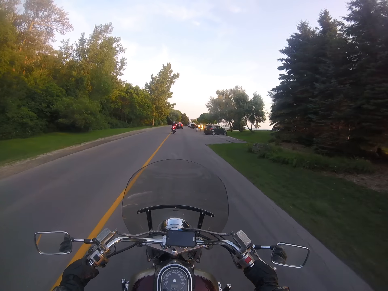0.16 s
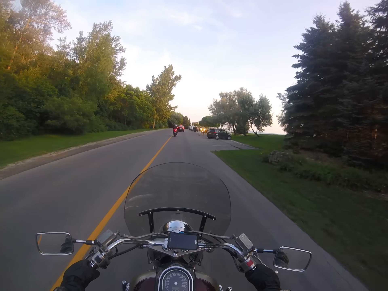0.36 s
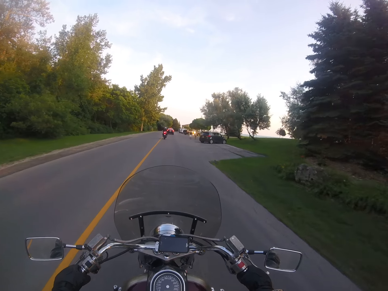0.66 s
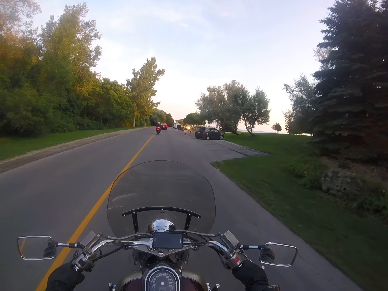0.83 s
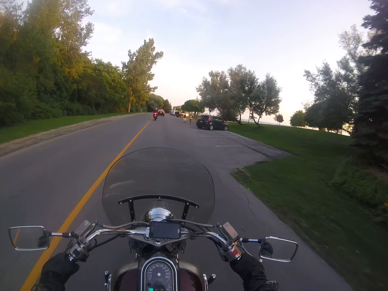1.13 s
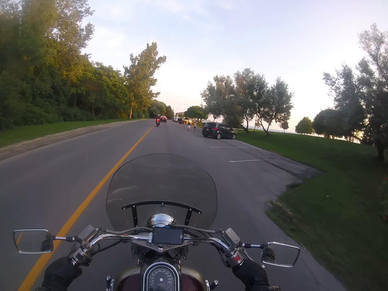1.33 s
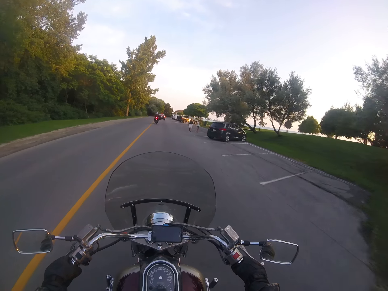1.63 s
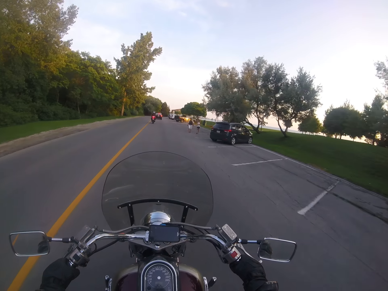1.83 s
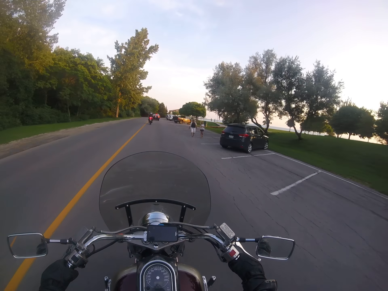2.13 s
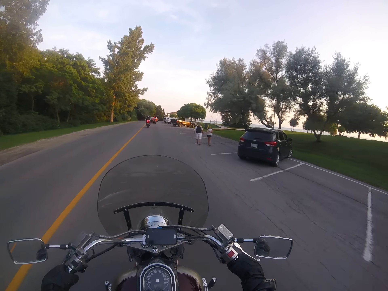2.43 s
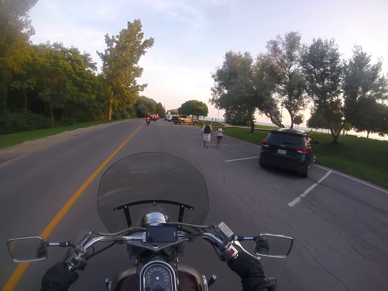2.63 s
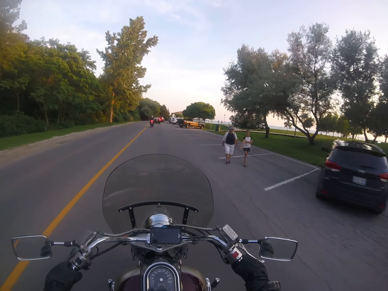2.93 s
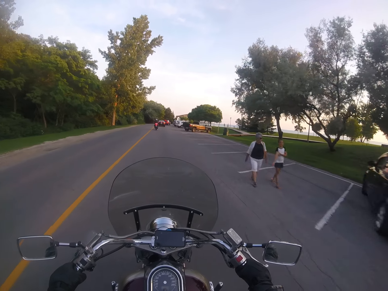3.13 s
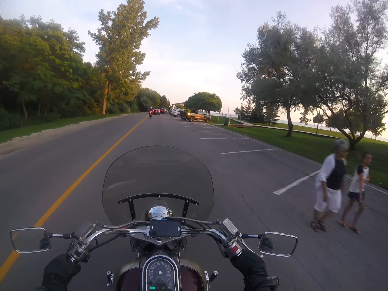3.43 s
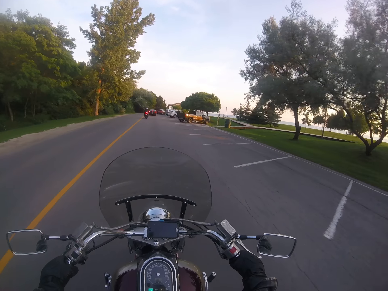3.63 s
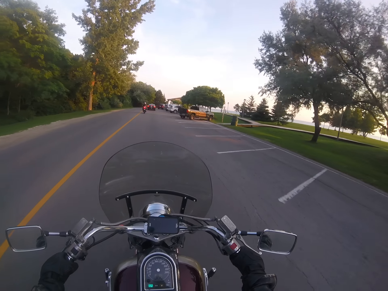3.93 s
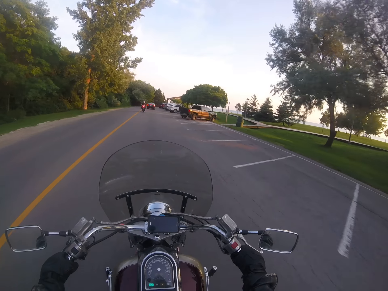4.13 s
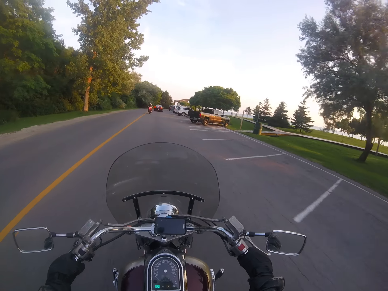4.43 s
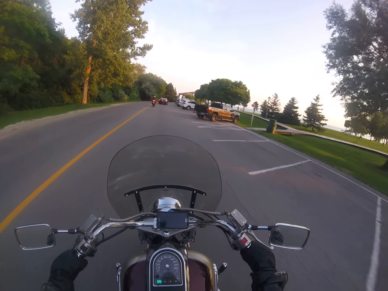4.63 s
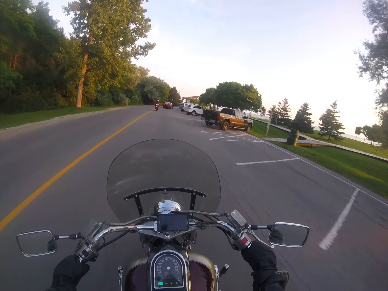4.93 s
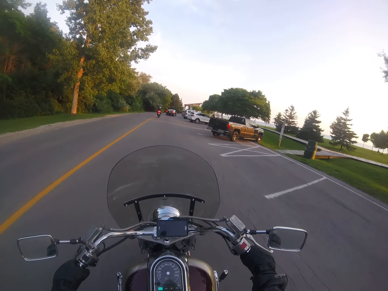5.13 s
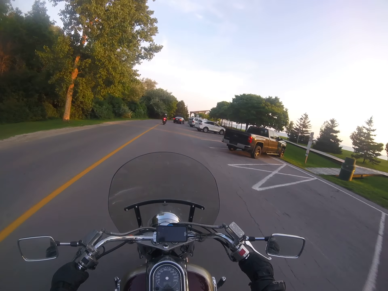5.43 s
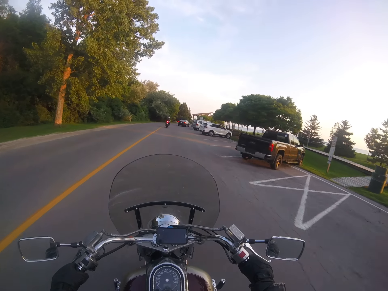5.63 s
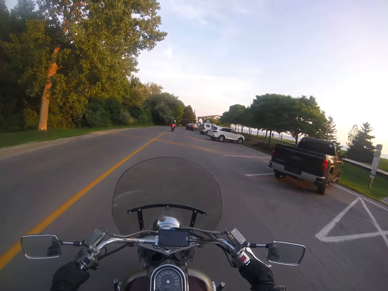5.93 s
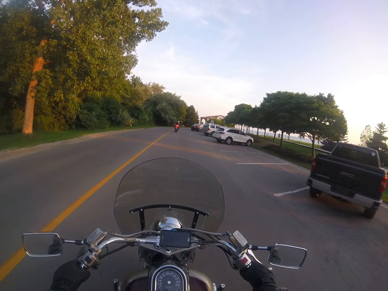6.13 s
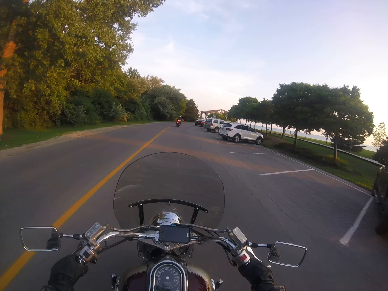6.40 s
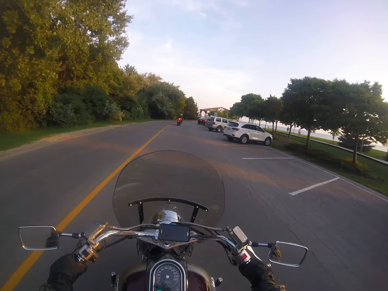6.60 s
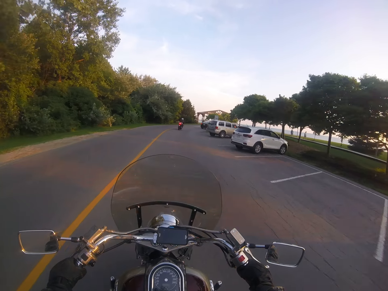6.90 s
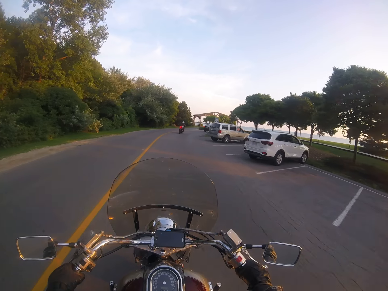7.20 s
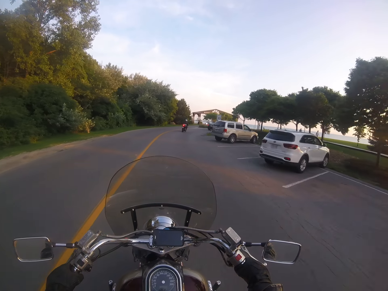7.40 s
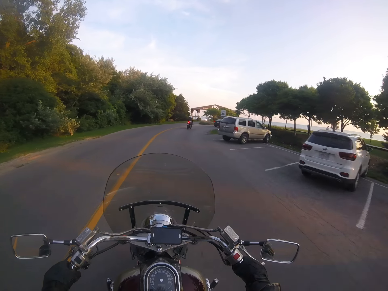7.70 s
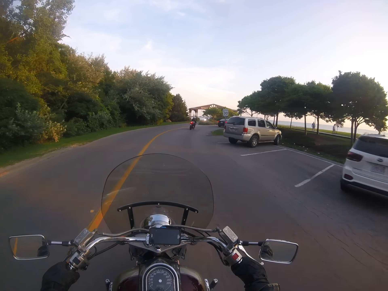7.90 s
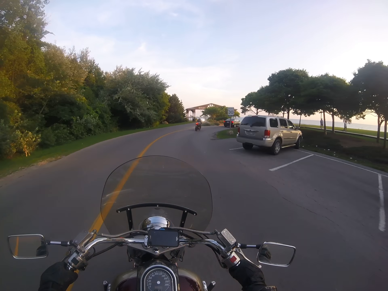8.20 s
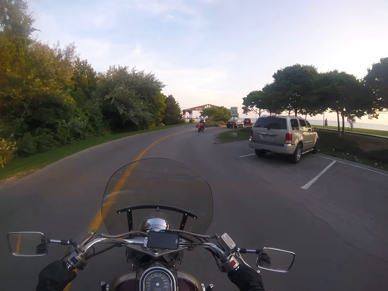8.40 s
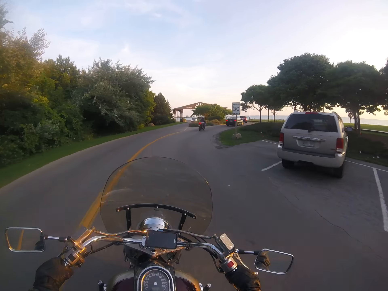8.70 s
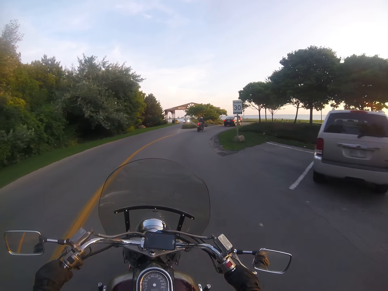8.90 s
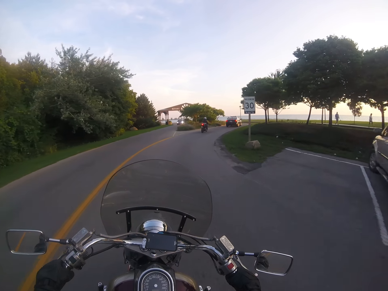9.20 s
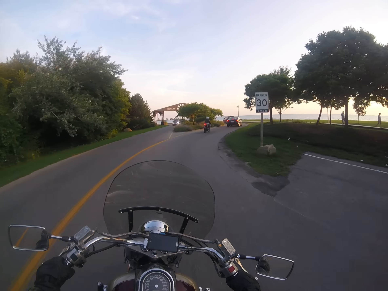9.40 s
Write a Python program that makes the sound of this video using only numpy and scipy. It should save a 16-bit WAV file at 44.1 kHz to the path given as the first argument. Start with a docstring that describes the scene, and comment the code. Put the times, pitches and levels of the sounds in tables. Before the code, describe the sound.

Close, boxy sound from a small camera on a moving cruiser motorcycle in open air. A lumpy low engine rumble dominates, with fluttering wind and brief bassy gusts. First the throttle eases off over rough pavement, with ticking fittings and seam knocks; then smoother coasting with whirring, clattering valve gear. A two-second pull makes the exhaust louder and raspier, before it drops back to a gentle, slowly falling chug with a few late rattles.

```python
"""The rider of a V-twin cruiser hears two unevenly spaced exhaust thumps per cycle along a park road.
Each firing is an impulse that excites the pipe; it barks in its own header under throttle, softer when coasting.
Valve gear clatters as struck metal and the airbox hums once a cycle. Tyres roar on coarse asphalt,
seams knock and fittings tick, all as filtered noise. Wind rumbles as noise and booms as short
low tones around a small cased camera, whose case rings in the midrange."""
import sys
import numpy as np
from scipy import signal
from scipy.fft import rfft, irfft, next_fast_len
from scipy.io import wavfile
from scipy.ndimage import uniform_filter1d

SR = 44100
rng = np.random.default_rng(int(sys.argv[2]) if len(sys.argv) > 2 else 0)


def store_wav(level_fs):
    """Save 16-bit WAV to argv[1]."""
    pcm = np.round(np.clip(np.atleast_2d(level_fs), -1, 1) * 32767)
    wavfile.write(sys.argv[1], SR, pcm.T.astype(np.int16))


N = 421155
T = np.arange(N) / SR  # time in seconds


def undb(db):
    """Logarithmic level: decibels become an amplitude ratio."""
    return 10 ** (np.asarray(db) / 20)


def unit(x):
    """Normalisation: the signal is scaled to an rms of 1."""
    return x / np.sqrt(np.mean(x ** 2))


def noise():
    """White noise: independent random samples carry equal power at all frequencies."""
    return rng.standard_normal(N)


def curve(table):
    """Linear interpolation: straight lines join the points of a table in time."""
    return np.interp(T, *np.transpose(table))


def colour(x, spectrum=((1, 0),), modes=()):
    """Minimum-phase filtering: a smooth spectrum plus resonance peaks, made causal by its cepstrum."""
    size = next_fast_len(N + SR // 2, True) // 2 * 2
    hz = np.arange(size // 2 + 1) * SR / size
    points = np.array(spectrum)
    db = np.interp(np.log(hz + 1), np.log(points[:, 0]), points[:, 1])
    for centre, width, peak in modes:
        db = db + peak / (1 + (2 * (hz - centre) / width) ** 2)
    # fold the cepstrum onto positive time, so that nothing sounds before its cause
    cepstrum = irfft(db * np.log(10) / 20)
    cepstrum[1:size // 2] *= 2
    cepstrum[size // 2 + 1:] = 0
    response = np.exp(rfft(cepstrum))
    return irfft(rfft(x, size) * response)[:N]


def strikes(times, sizes):
    """Impulsive excitation: one impulse of the given size at each time."""
    inside = (times >= 0) & (times < (N - 1) / SR)
    return np.bincount((times[inside] * SR).astype(int), sizes[inside], N)


def fade(x, decay_s):
    """Exponential decay: each impulse jumps up and falls to 1 / e in decay_s."""
    return signal.lfilter([1], [1, -np.exp(-1 / (decay_s * SR))], x)


def soften(x, length_s):
    """Smoothing: a weighted moving average rounds every edge."""
    window = signal.windows.hann(int(length_s * SR) + 3)
    return signal.fftconvolve(x, window / window.sum(), "same")


def swell(at, half_s):
    """Gaussian envelope: a bell-shaped rise and fall with peak 1."""
    return np.exp(-.5 * np.minimum(np.abs(T - at) / half_s, 10) ** 2)


def walk(rate):
    """Slow random modulation: levels held for 1 / rate s and slewed twice, with rms 1."""
    hold = int(SR / rate)
    steps = np.repeat(rng.standard_normal(N // hold + 1), hold)
    slewed = uniform_filter1d(uniform_filter1d(steps, hold), hold)
    return unit(slewed[:N])


def passes(crank, place, jitter_s):
    """Phase locking: events fall where the crank passes one place in its cycle, with slight jitter."""
    times = np.interp(np.arange(int(crank[-1]) + 1) + place, crank, T, left=-1, right=-1)
    return times + jitter_s * rng.standard_normal(len(times))


def ring(blows, hz, decay_s, wander=0.03):
    """Damped resonance: each blow opens a short ring whose pitch wanders slightly."""
    phase = hz * np.cumsum(1 + wander * walk(70)) / SR
    return soften(fade(blows, decay_s), length_s=0.0057) * np.sin(2 * np.pi * phase)


def echo(x, lag_s, loss_db):
    """Reflection: a wave runs along the pipe and comes back weaker."""
    return x + undb(-loss_db) * np.interp(T - lag_s, T, x, left=0)


def front(blast, smear_s=0.00642, rough_db=-6, rough_s=0.0062):
    """Dispersion and turbulence: header bends smear a steep front, lows first; eddies roughen it."""
    t = np.arange(int(smear_s * SR)) / SR
    sweep = signal.chirp(t, 100, smear_s, 2200) * signal.windows.tukey(len(t), .3)
    smeared = unit(signal.fftconvolve(blast, sweep)[:N])
    eddies = colour(noise(), [(2000, 0), (2600, -30)])
    rough = unit(soften(fade(blast, rough_s), length_s=0.0085) * eddies)
    return smeared + undb(rough_db) * rough


# The two cylinders. Each row: place in the cycle 0-1, relative thump when coasting in dB,
# relative thump at full throttle in dB, relative bark in dB.
FIRINGS = [(.935, 4, 6.5, -3), (.27, -5, 3.5, 1)]
# Spectra of pipe thump, drone under load, header honk, gas bark and silencer chug.
# Each row: frequency in Hz, relative level in dB.
PIPE_SPECTRUM = [(10, -40), (30, -32), (55, -3.5), (70, 10), (90, -1.5), (112, -7.5), (155, -6), (200, 2.5),
                 (238, -9), (275, -0.8), (335, -25), (480, -33.5), (900, -47), (3000, -77)]
DRONE_SPECTRUM = [(20, -28), (50, -22), (72, 8), (100, -17.5), (125, -1), (170, -3.5), (275, -32.5),
                  (600, -72)]
HONK_SPECTRUM = [(150, -33), (300, -5.5), (450, 7.5), (700, -2.5), (850, -11.5), (1500, -6), (2000, -17),
                 (8000, -63)]
BARK_SPECTRUM = [(120, -35), (300, 9), (450, -5), (700, 0.5), (850, -7), (1300, 1), (1900, -8),
                 (2500, -5.5), (3500, -3), (4400, -9), (5400, -19), (8000, -24), (14000, -79)]
CHUG_SPECTRUM = [(200, -39), (400, -2), (680, -0.5), (860, -11), (1050, -1), (1400, -12.5), (2200, -27),
                 (6000, -63)]
# Resonances of the exhaust pipe, of the silencer under load and of the header pipes in each puff of gas.
# Each row: frequency in Hz, width in Hz, peak in dB.
PIPE_RESONANCES = [(85.5, 14.7, 5.5)]
SILENCER_RESONANCES = [(271, 20, 7)]
PUFF_RESONANCES = [(530, 110, 5), (1600, 440, 4), (2430, 310, 6.5)]
# Resonances of each cylinder's own header: one list per cylinder.
# Each row of a list: frequency in Hz, width in Hz, peak in dB.
HEADER_RESONANCES = [
    [(406, 51, 11), (480, 91, 1), (680, 95, 9), (953, 140, 17), (1440, 250, 8)],
    [(497, 76, 14.4), (605, 55, 3.6), (787, 28, 9.5), (970, 120, 3.2)],
]
# thumps come back from the silencer, the honk from the end of the pipe; fronts knock the pipe wall
SILENCER_S, SILENCER_LOSS_DB = .0065, 8
TAILPIPE_S, TAILPIPE_LOSS_DB = 0.013, 3
KNOCK_HZ = 1527


def exhaust(crank, throttle, thump_scatter_db=0.53, bark_scatter_db=1.07, drone_db=-1,
            puff_s=0.0036, puff_lead_s=0.00051, tail_s=0.054, tail_db=-22,
            honk_db=3.0, knock_db=7.5, knock_s=0.003, chug_db=-6.5, chug_s=0.019):
    """Pulsed resonator: firings thump the pipe and drone under load; honk, gas, knock and chug make the bark."""
    thumps, blasts, honk = 0, 0, 0
    for (place, coast_db, load_db, bark_db), modes in zip(FIRINGS, HEADER_RESONANCES):
        times = passes(crank, place, jitter_s=.00005)
        load = np.interp(times, T, throttle)
        chance = rng.standard_normal((len(times), 2))
        # combustion is more even under load
        uneven_db = thump_scatter_db * (1 - load / 2) * chance[:, 0]
        thump_db = coast_db + load * (load_db - coast_db) + uneven_db
        thumps = thumps + strikes(times, undb(thump_db))
        blast = strikes(times - puff_lead_s, undb(bark_db + bark_scatter_db * chance[:, 1]))
        blasts = blasts + blast
        honk = honk + colour(front(blast), HONK_SPECTRUM, modes)

    # the valve takes a few milliseconds to open, which rounds each puff and thump
    pressure = echo(soften(thumps, length_s=0.0038), SILENCER_S, SILENCER_LOSS_DB)
    thump = unit(colour(pressure, PIPE_SPECTRUM, PIPE_RESONANCES))
    drone_tone = unit(colour(thumps, DRONE_SPECTRUM, SILENCER_RESONANCES))
    drone = undb(drone_db) * throttle * drone_tone / 2

    puffs = fade(blasts, puff_s) + undb(tail_db) * fade(blasts, tail_s)
    rough_gas = soften(puffs, length_s=0.0086) * noise()
    gas = unit(colour(rough_gas, BARK_SPECTRUM, PUFF_RESONANCES))
    knock = undb(knock_db) * ring(blasts, KNOCK_HZ, knock_s)
    # gas swirls in the silencer after each firing
    swirl = soften(fade(blasts, chug_s), length_s=.004) * noise()
    chug = undb(chug_db) * unit(colour(swirl, CHUG_SPECTRUM))
    honk = undb(honk_db) * unit(echo(honk, TAILPIPE_S, TAILPIPE_LOSS_DB))
    return -(thump + drone), gas + knock + chug - honk


# The four valve landings. Each row: place in the cycle 0-1, relative tick in dB,
# ring of the part struck in Hz, level of that ring in dB, level of the rocker cover's ring in dB.
VALVE_LANDINGS = [(0.89, -7, 1300, -6.5, -3.5), (0.15, -8.5, 1000, 0.5, -2.5),
                  (0.32, -12.5, 2900, -20, -10), (0.49, -5.5, 2600, -10, -14)]
# Spectrum of ticks and gear whirr. Each row: frequency in Hz, relative level in dB.
CLATTER_SPECTRUM = [(120, -5), (260, 8.5), (370, 3.5), (480, 3), (680, -0.5), (850, -7.5), (1250, -0.5),
                    (1850, -5), (2500, -1.5), (3400, -11.5), (4200, -11), (5400, -18), (8000, -18.5),
                    (14000, -41)]
COVER_HZ = 1493


def clatter(crank, scatter_db=2.0, ring_s=0.014, whirr_db=0.4, ring_cycles=3.5, cover_s=0.0058):
    """Impact excitation: four valve landings a cycle tick and ring part and rocker cover, over gear whirr."""
    taps, rings, cover = 0, 0, 0
    for place, tick_db, hz, ring_db, cover_db in VALVE_LANDINGS:
        times = passes(crank, place, jitter_s=0.00086)
        blows = strikes(times, undb(scatter_db * rng.standard_normal(len(times))))
        taps = taps + undb(tick_db) * blows
        cover = cover + undb(cover_db) * blows
        rings = rings + undb(ring_db) * ring(blows, hz, ring_cycles / hz)
    ticking = unit(soften(fade(taps, ring_s), length_s=0.019) * noise())
    whirr = undb(whirr_db + 1.26 * walk(14)) * noise()
    return unit(colour(ticking + whirr, CLATTER_SPECTRUM)) + rings + ring(cover, COVER_HZ, cover_s)


AIRBOX_HZ, AIRBOX_PLACE = 487.3, .55  # note, and place in the cycle 0-1


def airbox(crank, length_s=0.02293, scatter_db=2.5):
    """Cavity resonance: once a cycle the intake draws air and the airbox hums briefly on one note."""
    times = passes(crank, AIRBOX_PLACE, jitter_s=.0003)
    gulps = strikes(times, undb(scatter_db * rng.standard_normal(len(times))))
    t = np.arange(int(length_s * SR)) / SR
    note = signal.windows.hann(len(t)) * np.sin(2 * np.pi * AIRBOX_HZ * t)
    return unit(signal.fftconvolve(gulps, note, "same"))


# The rider's right hand. Each row: time in seconds, throttle 0-1.
THROTTLE_HAND = [(0, 0.31), (.7, 0.1), (1.2, 0.01), (1.7, 0), (4.05, 0.04), (4.11, 0.34), (4.3, 0.4),
                 (4.7, 0.66), (5.5, 0.74), (6.03, 0.62), (6.12, 0.28), (6.22, 0.12), (6.6, 0.01),
                 (9.55, 0.02)]
START_PHASE = .014  # cycles
# engine level follows revs about the cruising speed, and throttle
CRUISE_HZ = 13.58  # four-stroke cycles per second
THUMP_DB, THUMP_DB_PER_HZ, THUMP_LOAD_DB = -40.5, 1, 2
UPPER_DB, UPPER_DB_PER_HZ, UPPER_LOAD_DB = -53, 0.55, 11.5
# the firings die down once as the throttle shuts
LULL_S, LULL_HALF_S, LULL_DB = 1.21, 0.075, -8


def engine(speed, bark_db=-5.5, clatter_db=-1.0, airbox_db=-10):
    """Load dependence: revs and throttle set the level; throttle trades mechanical noise for bark."""
    crank = START_PHASE + np.cumsum(speed) / SR
    throttle = np.clip(curve(THROTTLE_HAND), 0, 1)
    revs = speed - CRUISE_HZ
    thump, bark = exhaust(crank, throttle)
    mechanics = undb(clatter_db) * clatter(crank) + undb(airbox_db) * airbox(crank)
    upper = undb(bark_db) * np.sqrt(throttle) * bark + np.sqrt(1 - throttle) * mechanics
    lull_db = LULL_DB * swell(LULL_S, LULL_HALF_S)
    thump_db = THUMP_DB + THUMP_DB_PER_HZ * revs + THUMP_LOAD_DB * np.sqrt(throttle) + lull_db
    upper_db = UPPER_DB + UPPER_DB_PER_HZ * revs + UPPER_LOAD_DB * throttle
    return undb(thump_db) * thump + undb(upper_db) * upper


# Spectrum of the wind rumble. Each row: frequency in Hz, relative level in dB.
RUMBLE_SPECTRUM = [(10, -16.5), (25, -4.5), (50, 0), (65, 1.5), (84, 8.5), (110, -8), (170, -11),
                   (240, -18.5), (350, -23.5), (600, -30), (2000, -62), (6000, -100)]
# Strong gusts at the camera. Each row: time of the peak in seconds, peak in dB before the
# common boom_db, half length in seconds.
STRONG_GUSTS = [(0.275, -14, 0.023), (0.464, -16, 0.035), (0.898, -19.5, 0.016), (1.123, -17.5, 0.012),
                (1.602, -18.5, 0.027), (2.76, -14.5, 0.024), (3.624, -18, 0.021), (3.99, -21.5, 0.012),
                (4.563, -21.5, 0.02), (5.089, -19, 0.017), (5.138, -18, 0.026), (5.26, -22.5, 0.029),
                (5.39, -22.5, 0.054), (5.629, -20, 0.075), (5.736, -15.5, 0.045), (6.108, -23.5, 0.03),
                (6.389, -18, 0.023), (6.474, -24, 0.035), (6.658, -26.5, 0.036), (6.819, -22, 0.0088),
                (7.028, -18.5, 0.043), (7.259, -17.5, 0.035), (7.703, -21, 0.037), (8.141, -21.5, 0.023),
                (8.253, -21, 0.055), (8.362, -20.5, 0.027), (9.243, -23.5, 0.036)]
# all gusts ring near one pitch; weak ones come at random, their level also before boom_db
BOOM_HZ, BOOM_SCATTER_HZ = 83.6, 1.5
WEAK_GUSTS_PER_S, WEAK_GUST_DB, WEAK_GUST_HALF_S = 1.2, -26.5, 0.016


def wind(speed, rumble_db=-37.0, rumble_db_per_hz=2.5, flutter_db=1.46, boom_db=-4.0):
    """Turbulence: eddies behind the windscreen rumble, more with engine speed; gusts swell into low booms."""
    level_db = rumble_db + rumble_db_per_hz * (speed - CRUISE_HZ) + flutter_db * walk(8.3)
    rumble = undb(level_db) * unit(colour(noise(), RUMBLE_SPECTRUM))
    weak_times = rng.uniform(0, T[-1], int(WEAK_GUSTS_PER_S * T[-1]))
    weak_gusts = [(at, WEAK_GUST_DB, WEAK_GUST_HALF_S) for at in weak_times]
    booms = 0
    for at, db, half_s in STRONG_GUSTS + weak_gusts:
        hz = BOOM_HZ + BOOM_SCATTER_HZ * rng.standard_normal()
        tone = np.sin(2 * np.pi * (hz * (T - at) + rng.random()))
        booms = booms + undb(db + boom_db) * swell(at, half_s) * tone
    return rumble + booms


# Spectrum of the microphone hiss. Each row: frequency in Hz, relative level in dB.
HISS_SPECTRUM = [(1000, -31.5), (4500, -1), (5500, -10), (6100, -2.5), (6500, 8.5), (7100, 0.5),
                 (9000, -2.5), (10400, -13), (11800, -7), (13200, -8), (14500, -46)]


def hiss(hiss_db=-63):
    """Stationary noise: a smooth, steady microphone hiss."""
    return undb(hiss_db) * unit(colour(noise(), HISS_SPECTRUM))


# Stretches of coarse asphalt. Each row: time of the middle in seconds, roar in dB, buzz in dB,
# half length in seconds; both levels before the random patchiness.
COARSE_PATCHES = [(0.23, -57, -61.5, 0.33), (0.847, -54, -59.5, 0.11), (1.376, -50, -68, 0.038),
                  (8.2, -52, -59, 0.11), (9.35, -55, -72, 0.13)]
# Spectra of tyre roar and of shaken fittings. Each row: frequency in Hz, relative level in dB.
TYRE_SPECTRUM = [(100, -16.5), (230, 0), (300, 2), (420, -1.5), (500, -8.5), (700, -19), (1000, -27),
                 (3000, -34), (9000, -70)]
FITTING_SPECTRUM = [(300, -30), (900, 9.5), (1500, 19), (2500, 14), (4300, 8.5), (6000, -29), (12000, -25)]


def tyres(smooth_db=-70, patchy_db=3.5):
    """Roughness excitation: a dull roar swells on coarse asphalt, where the fittings buzz along."""
    coarse = sum(undb(db) * swell(at, half_s) for at, db, _, half_s in COARSE_PATCHES)
    shaking = sum(undb(db) * swell(at, half_s) for at, _, db, half_s in COARSE_PATCHES)
    roar = (undb(smooth_db) + coarse) * unit(colour(noise(), TYRE_SPECTRUM))
    buzz = shaking * unit(colour(noise(), FITTING_SPECTRUM))
    return undb(patchy_db * walk(13)) * (roar + buzz)


# Loose fittings shaken by the road. Each row: start in seconds, level in dB before rattle_db
# and the rounding of the edge, decay in seconds.
FITTING_JOLTS = [(.086, -40, 0.005), (.099, -38, .004), (0.196, -38, 0.0094), (.217, -42, .006),
                 (0.286, -38.5, 0.0035), (0.555, -36, .004), (0.625, -40, 0.0083), (.846, -45, .005),
                 (0.992, -38, 0.0055), (1.329, -39.5, 0.0066), (1.341, -42, 0.0087), (1.376, -43, 0.0055),
                 (1.584, -39.5, 0.0091), (1.606, -46, .006), (6.428, -38, 0.0033), (6.677, -40, 0.0038),
                 (6.84, -41, .003), (6.889, -48, 0.0027), (8.695, -44, .003), (8.768, -39, 0.0028),
                 (9.073, -42.5, .004), (9.371, -32.5, 0.0031)]
# Resonances of the fittings. Each row: frequency in Hz, width in Hz, peak in dB.
FITTING_RESONANCES = [(1490, 220, 1), (2450, 240, 4.5)]


def rattles(rattle_db=-5.0, chatter_db=2.0):
    """Repeated impact: fittings tick and shudder dryly, as short bursts of chattering noise."""
    grit = unit(colour(noise(), FITTING_SPECTRUM, FITTING_RESONANCES))
    chatter = undb(chatter_db * walk(400)) * grit
    jolts = 0
    for at, db, decay_s in FITTING_JOLTS:
        jolts = jolts + fade(strikes(np.array([at]), undb([db + rattle_db])), decay_s)
    return chatter * soften(jolts, length_s=0.014)


# Seams in the road. Each row: time in seconds, level in dB before bump_db and the rounding of the edge.
ROAD_SEAMS = [(.845, -37), (0.986, -37), (1.136, -40), (1.333, -39), (1.369, -37), (9.343, -42.5)]
# Spectrum of the knock. Each row: frequency in Hz, relative level in dB.
KNOCK_SPECTRUM = [(100, -12), (220, 2.5), (320, 1.5), (480, -8), (650, -8), (900, -22), (3000, -55)]


def bumps(bump_db=-1, decay_s=0.015):
    """Structural response: wheels strike seams; frame and windscreen answer with a dull knock."""
    times, db = np.transpose(ROAD_SEAMS)
    blows = soften(fade(strikes(times, undb(db + bump_db)), decay_s), length_s=.006)
    return blows * unit(colour(noise(), KNOCK_SPECTRUM))


# Engine speed. Each row: time in seconds, four-stroke cycles per second in Hz.
ENGINE_SPEED = [(0.0, 14.741), (0.5, 14.941), (1.0, 14.288), (1.6, 14.116), (3.45, 13.045), (4.0, 12.929),
                (4.3, 13.235), (4.6, 13.108), (5.5, 14.031), (6.0, 14.338), (6.25, 14.193), (6.5, 13.558),
                (6.85, 14.213), (7.25, 13.669), (8.0, 13.412), (8.5, 13.178), (9.55, 12.857)]


def scene():
    """Superposition: all sources add up at the rider's seat."""
    speed = curve(ENGINE_SPEED)
    return (engine(speed) + wind(speed) + hiss() + tyres() + rattles() + bumps())[None]


# Resonances of the camera case. Each row: frequency in Hz, width in Hz, peak in dB.
CASE_RESONANCES = [(348, 24, -6.5), (487, 32, 6.5), (528, 26, -2.5), (583.4, 34, 6.5), (958, 176, 4.5),
                   (1250, 78, -4), (1509, 380, 8.5), (1666, 57, 2.5), (2088, 27, 6), (2912, 350, 7.5),
                   (3860, 196, 6), (4206, 95, 7), (4890, 210, 5)]
TOP_HZ = 14450


def record(dry):
    """Linear filtering: the camera case rings in the midrange and a steep low-pass cuts off the top."""
    boxed = colour(dry[0], modes=CASE_RESONANCES)
    low_pass = signal.ellip(10, .2, 80, TOP_HZ, fs=SR, output="sos")
    return signal.sosfilt(low_pass, boxed)[None]


dry = scene()
out = record(dry)
store_wav(out)
```